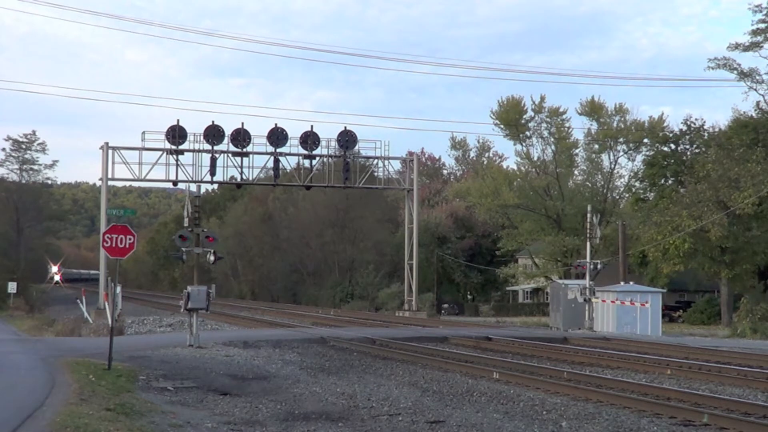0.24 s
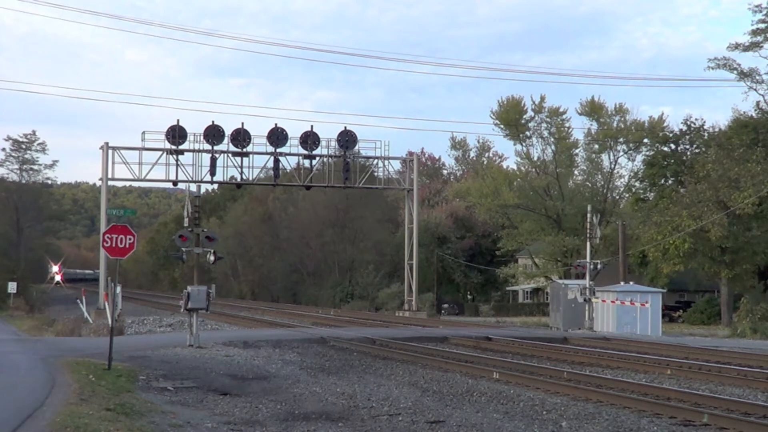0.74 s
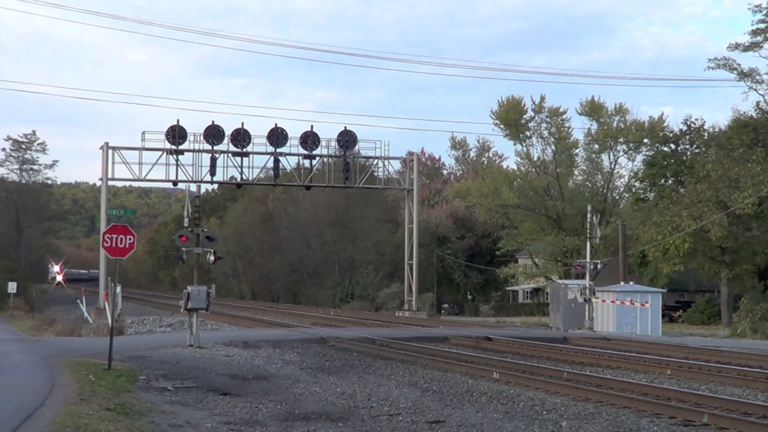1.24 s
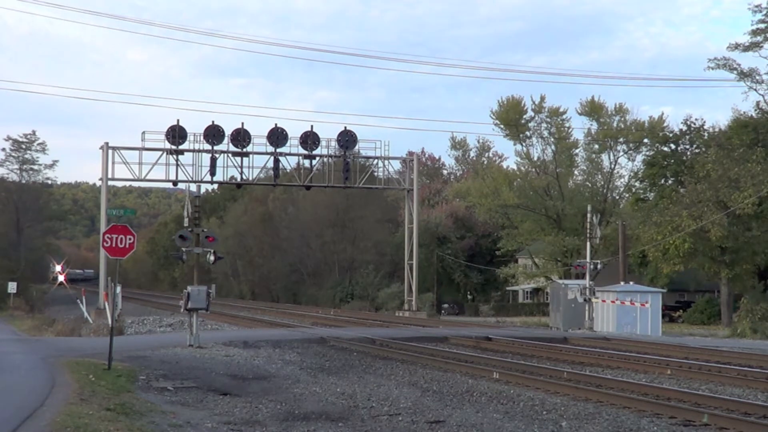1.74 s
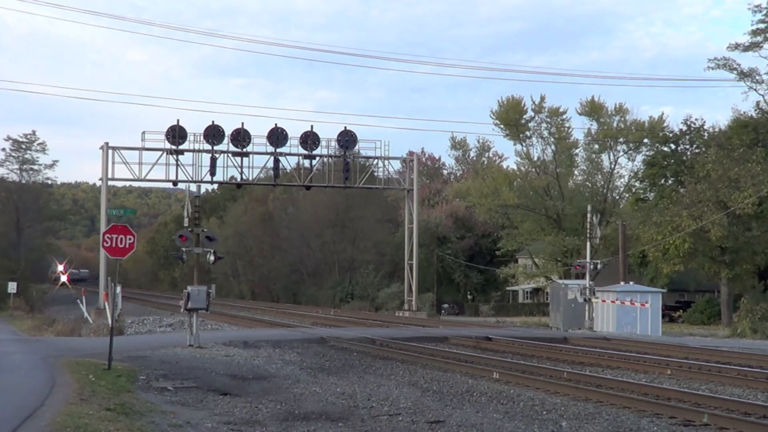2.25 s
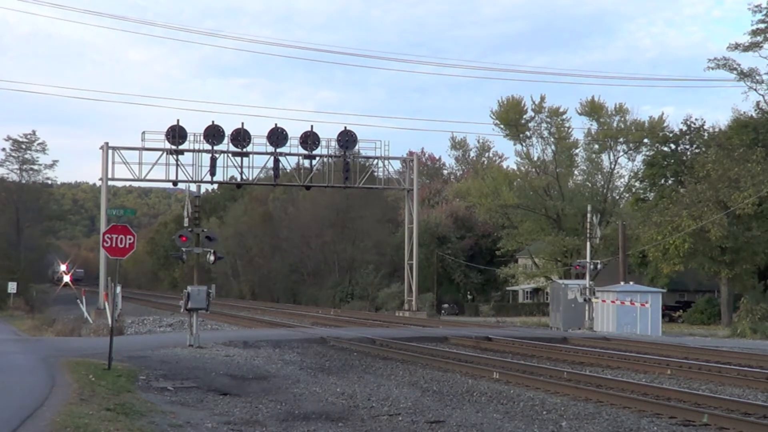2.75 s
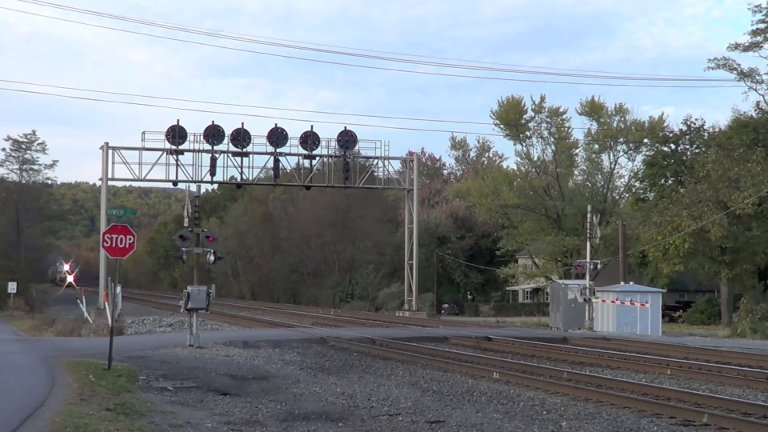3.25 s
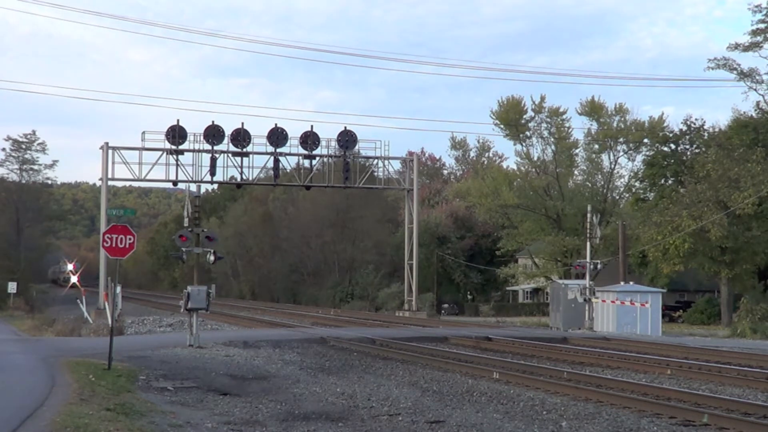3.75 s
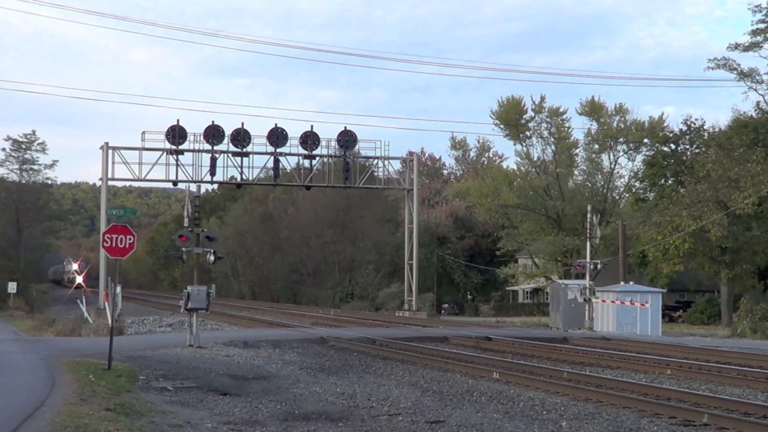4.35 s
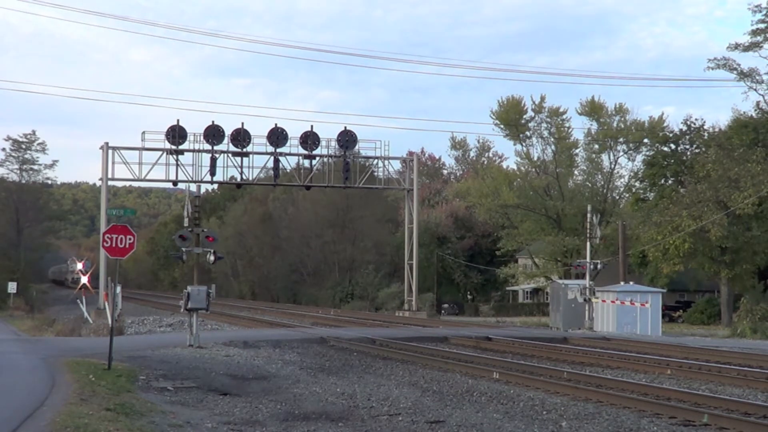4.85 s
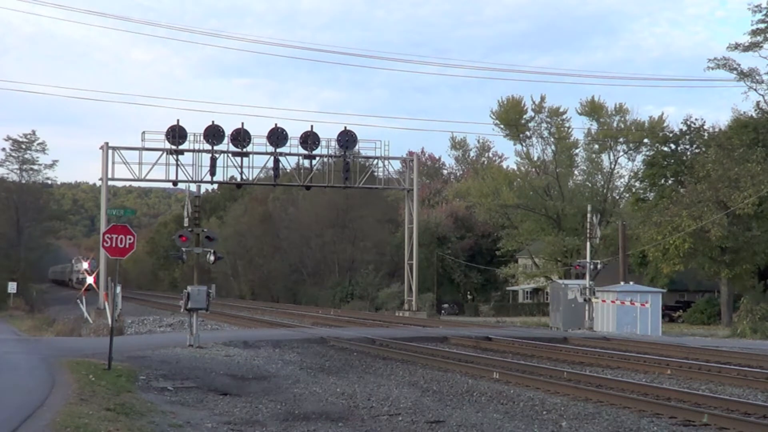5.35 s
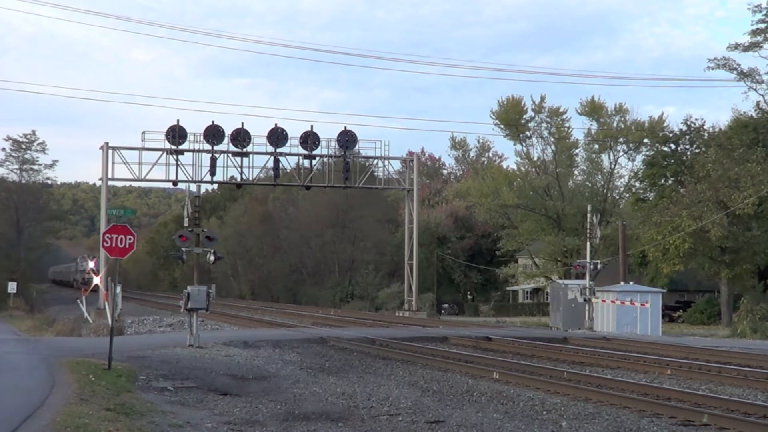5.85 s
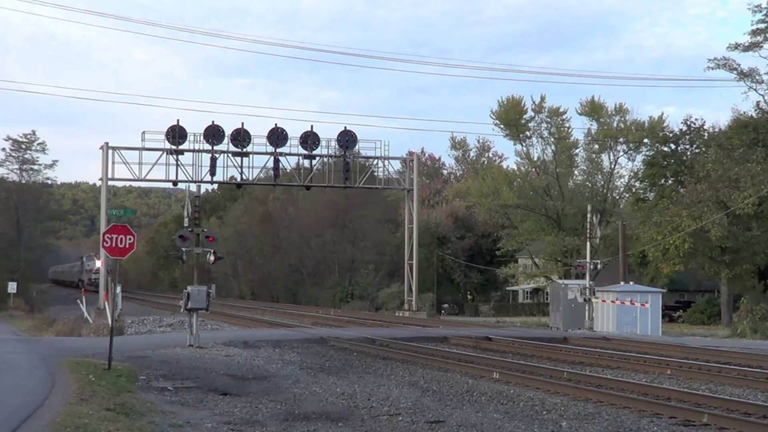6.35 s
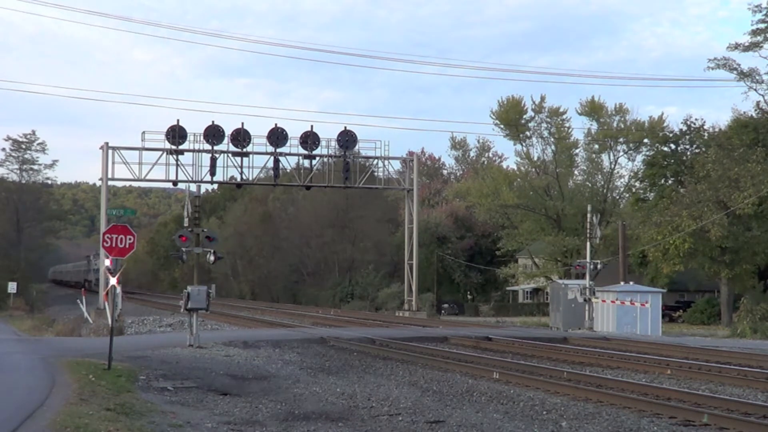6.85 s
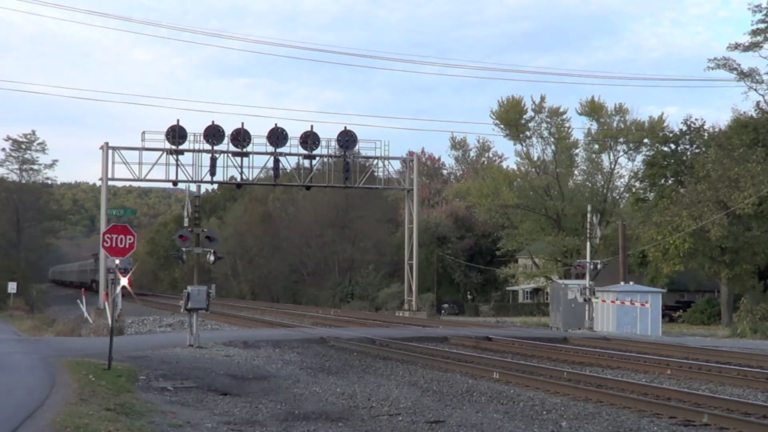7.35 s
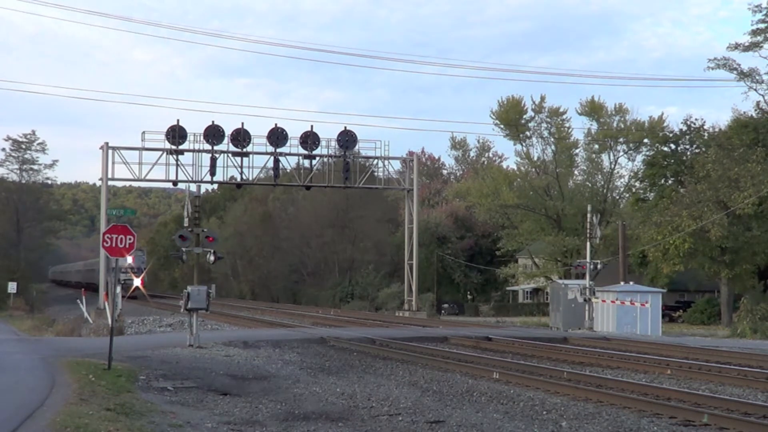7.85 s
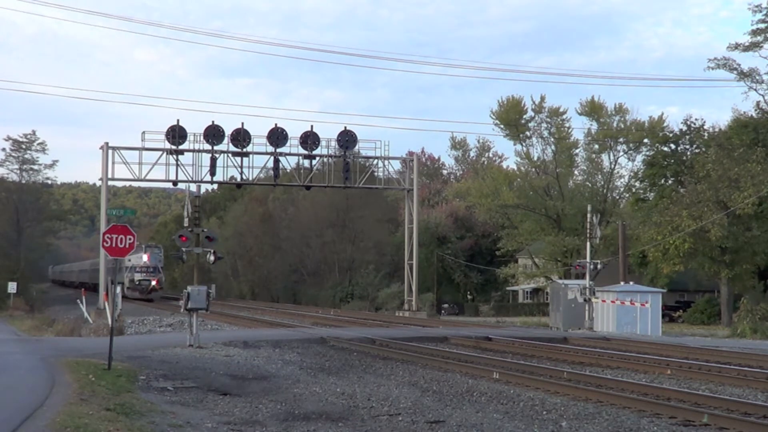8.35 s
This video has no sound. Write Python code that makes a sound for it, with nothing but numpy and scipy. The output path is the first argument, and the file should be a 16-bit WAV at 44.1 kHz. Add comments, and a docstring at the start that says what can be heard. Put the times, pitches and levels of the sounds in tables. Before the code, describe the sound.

A fixed trackside microphone hears a heavy diesel engine coming closer. At first there is a muted rumble with a distant airy rush, small rustles, insect shimmer and a brief bird twitter. The deep chugging boom and rough exhaust gain strength, echoing off trees; rolling noise grows and steel flanges scrape juddering. Just before the cut, a loud dissonant horn chord starts and is still sounding as it ends.

```python
"""A twelve-cylinder diesel locomotive approaches a rural level crossing under load, heard from beside the track.
Its exhaust is a train of unequal pulses, a pattern repeated eight times a second, sent through muffler and stack.
Shaped noise makes the rush of wheels and fans, louder and brighter as it nears; at the very end the air horn,
built from swelling harmonics, opens. Pulsing noise bands make insects, sliding sines a far bird, and short noise
bursts faint rustles; a light breeze and the camera's own hiss and whine lie behind."""
import sys
import numpy as np
from scipy import signal
from scipy.fft import rfft, irfft, next_fast_len
from scipy.io import wavfile
from scipy.ndimage import uniform_filter1d

SR = 44100
rng = np.random.default_rng(int(sys.argv[2]) if len(sys.argv) > 2 else 0)


def unload_audio(sound):
    """Save the sound as a 16-bit wav file, at the path given as the first command line argument."""
    columns = np.transpose(np.atleast_2d(sound))
    # keep every value between -1 and 1, then stretch to whole-number steps
    steps = np.round(np.clip(columns, -1, 1) * 32767)
    wavfile.write(sys.argv[1], SR, steps.astype(np.int16))


N = 378819
T = np.arange(N) / SR
PADDED = 2 * next_fast_len(N // 2 + SR // 2, True)  # transform length with room for tails


def undb(db):
    """Turn decibels into a gain."""
    return 10 ** (np.asarray(db) / 20)


def unit(x):
    """Scale a sound to an average (rms) strength of 1."""
    return x / np.sqrt(np.mean(x ** 2))


def sine(hz):
    """A sine whose pitch may change from sample to sample."""
    return np.sin(2 * np.pi * np.cumsum(hz) / SR)


def curve(rows):
    """Join (time, value) points by straight lines."""
    seconds, values = np.transpose(rows)
    return np.interp(T, seconds, values)


def log_frequencies():
    """Logarithms of the transform's frequencies, with those below 1 Hz held at 1 Hz."""
    return np.log(np.maximum(np.fft.rfftfreq(PADDED, 1 / SR), 1))


def colour(x, points, ringing=False):
    """Filter by a spectrum of (Hz, dB) points; a ringing body answers only after it is struck."""
    hz, db = np.transpose(points)
    gain = undb(np.interp(log_frequencies(), np.log(hz), db))
    if ringing:
        # minimum phase: fold the cepstrum so that nothing sounds ahead of the blow
        cepstrum = irfft(np.log(gain))[:PADDED // 2]
        gain = np.exp(2 * rfft(cepstrum, PADDED) - cepstrum[0])
    return irfft(rfft(x, PADDED) * gain, PADDED)[..., :N]


def resonate(x, hz, width):
    """A resonance, applied twice for steep skirts."""
    b, a = signal.iirpeak(min(hz, SR / 2 - 1), hz / (1.5 * width), fs=SR)
    once = signal.lfilter(b, a, x)
    return signal.lfilter(b, a, once)


def split(x, edge_hz):
    """The parts of a sound below and above a frequency."""
    lowpass = signal.butter(8, edge_hz, fs=SR, output="sos")
    low = signal.sosfiltfilt(lowpass, x, padlen=0)
    return low, x - low


def walk(rate):
    """Smooth random wander with a spread near 1, drawing about `rate` new values a second."""
    k = max(int(SR / rate), 2)
    steps = np.repeat(rng.standard_normal(N // k + 1), k)
    smooth = uniform_filter1d(uniform_filter1d(steps, k), k)
    return unit(smooth)[:N]


def stereo_noise(side_db):
    """Noise shared by both ears, plus a part of opposite sign in each."""
    mid, side = rng.standard_normal((2, N))
    return mid + undb(side_db) * np.array([side, -side])


def pulses(times, sizes):
    """Single-sample impulses at the given times."""
    inside = (times >= 0) & (times < (N - 1) / SR)
    return np.bincount((times[inside] * SR).astype(int), sizes[inside], N)


def opening(start, rise):
    """A straight rise from 0 to 1 that then stays open."""
    return np.clip((T - start) / rise, 0, 1)


def envelope(start, attack, hold, release):
    """A straight rise, a hold and an exponential fall."""
    return opening(start, attack) * np.exp(-np.maximum(T - start - attack - hold, 0) / release)


def woods(x, t60, wet_db):
    """The direct sound plus its scatter from the trees, different at each ear; t60 is the 60 dB decay in s."""
    t = T[:SR]
    decay = undb(-60 * t / t60)
    build_up = 1 - np.exp(-t / 0.014)
    tail = rng.standard_normal((2, SR)) * decay * build_up
    tail /= np.sqrt(np.sum(tail ** 2, axis=1, keepdims=True))
    return x + undb(wet_db) * signal.fftconvolve(x[None], tail, axes=1)[:, :N]


def nearing(db, loss_db_per_m):
    """Level in dB on the approach: sound spreads as 1 / distance and ground and air take more with each metre."""
    start_m, train_m_per_s = 217.5, 16.83  # distance at the start, steady speed towards the crossing
    reference_m = 100  # the distance at which `db` is the level
    metres = np.maximum(start_m - train_m_per_s * T, 10)
    return db - 20 * np.log10(metres / reference_m) - loss_db_per_m * (metres - reference_m)


def hidden():
    """How far the bend still screens the locomotive, from 1 down to 0."""
    clears_s, clearing_s = 3.52, 0.58  # when it comes out, how gradually
    return (1 - np.tanh((T - clears_s) / (2 * clearing_s))) / 2


def camera():
    """Electronic hiss, a thin buzz pulsing at the picture rate, and steady whines."""
    # hiss spectrum: (frequency [Hz], relative level [dB])
    hiss_spectrum = [(100, 9), (2000, 6.5), (5000, -2), (8000, -2), (11000, -1), (14000, -1), (16000, -7)]
    # steady tones: (frequency [Hz], level [dB])
    whine_tones = [(7882, -79), (10369, -76.5), (15734, -63)]
    hiss = unit(colour(stereo_noise(side_db=-25.0), hiss_spectrum)) * undb(-55.5)
    picture_hz = 59.94
    gate = np.exp(-((T * picture_hz) % 1) / 0.26)  # fades within each picture
    grains = rng.standard_normal(N) * gate * undb(2.2 * walk(70))
    buzz = unit(resonate(grains, 12480, 700)) * undb(-65)
    whine = sum(np.sqrt(2) * undb(db) * np.sin(2 * np.pi * hz * T) for hz, db in whine_tones)
    return hiss + buzz + whine


def breeze(db=-53):
    """Light air rumbles on each microphone port separately, as low noise around 42 Hz."""
    rumble = unit(resonate(rng.standard_normal((2, N)), 42, 40))
    return rumble * undb(db + 1.2 * walk(1.5))


def chirr(hz, width, rate, db, depth=0.24):
    """One insect voice: a narrow noise band that pulses and swells."""
    chirp = 1 + depth * sine(rate * (1 + 0.144 * walk(4)))
    band = unit(resonate(stereo_noise(side_db=0), hz, width))
    return band * chirp * undb(db + walk(1.94))


def insects():
    """A distant chorus in the verge, each voice in its own band and rhythm."""
    # voices: (centre [Hz], width [Hz], average chirp rate [1/s], average level [dB])
    voices = [(3560, 520, 14, -61), (3520, 90, 5, -70), (4090, 70, 2.2, -66.7), (6530, 1900, 11, -63),
              (7600, 300, 9, -75.5)]
    return sum(chirr(*voice) for voice in voices)


def rustles(grain_db=3.0):
    """Brief grainy swishes and ticks close by: noise bands that swell and fade in a bell shape."""
    # swishes: (middle [s], spread [s], centre [Hz], width [Hz], level [dB])
    swishes = [(0.044, .002, 2100, 450, -41), (0.045, .002, 5700, 1500, -43),
               (0.06, 0.052, 8460, 6000, -51.5), (.22, 0.056, 5970, 5000, -57),
               (1.5, 0.83, 3930, 2500, -61), (1.06, 0.14, 7000, 6000, -61.5), (1.65, .07, 7960, 6000, -56),
               (4.756, .007, 9500, 1500, -53.5), (5.54, .008, 10200, 1800, -58.5)]
    grains = stereo_noise(side_db=-12) * undb(grain_db * walk(300))
    out = 0
    for middle, spread, hz, width, db in swishes:
        swell = np.exp(-((T - middle) / spread) ** 2 / 2)
        out = out + unit(resonate(grains, hz, width)) * undb(db) * swell
    return out


def bird(uneven_db=0.5):
    """A small bird twitters far off: quick sine notes that each slide down, blurred by the trees."""
    # notes: (middle [s], pitch at the middle [Hz], level [dB])
    notes = [(1.24, 3230, -60), (1.283, 3280, -61.5), (1.318, 3280, -57), (1.358, 3310, -58.5),
             (1.401, 3310, -57), (1.445, 3260, -60), (1.486, 3250, -58.5), (1.524, 3320, -61),
             (1.568, 3300, -61), (1.61, 3270, -62), (1.653, 3220, -58.5), (1.687, 3330, -57.5),
             (1.714, 3520, -59), (1.756, 3410, -56.5), (1.792, 3480, -61), (1.83, 3440, -57),
             (1.872, 3500, -61), (1.907, 3460, -58.5), (1.98, 3430, -53), (2.018, 3550, -57),
             (2.055, 3470, -61), (2.09, 3450, -56.5), (2.245, 3600, -59.5)]
    spread_s, fall_hz_per_s = .0058, 6000  # spread of a note's bell shape, downward slide
    out = np.zeros(N)
    for middle, hz, db in notes:
        near = np.abs(T - middle) < 5 * spread_s
        t = T[near] - middle
        phase = 2 * np.pi * (hz * t - fall_hz_per_s * t ** 2 / 2)
        swell = np.exp(-(t / spread_s) ** 2 / 2)
        out[near] += np.sqrt(2) * undb(db) * swell * np.sin(phase)
    return woods(out * undb(uneven_db * walk(200)), t60=.4, wet_db=-8)


def far_rush():
    """A distant mid-pitched rush of noise holds for a moment, flares once and dies away."""
    # rushes: (start [s], attack [s], hold [s], release [s], centre [Hz], width [Hz], level [dB])
    rushes = [(-.1, 0.093, 1.36, 0.82, 850, 735, -47), (.8, .07, .05, .07, 820, 350, -44.5)]
    out = 0
    for *shape, hz, width, db in rushes:
        band = unit(resonate(stereo_noise(side_db=-1.5), hz, width))
        out = out + band * envelope(*shape) * undb(db + 0.88 * walk(8.9))
    return out


def flanges(judder_db=1.5):
    """Wheel flanges scrape the curve: juddering noise rings the steel at a few pitches."""
    # ringing of the steel: (frequency [Hz], width [Hz], relative level [dB])
    steel_modes = [(1950, 330, 2), (2330, 330, .3), (2800, 420, -2.5), (3280, 330, -10)]
    # the air takes the top off that ringing: (frequency [Hz], gain [dB])
    dulling = [(3200, 0), (4000, -9), (5000, -22)]
    # scrapes: (start [s], attack [s], hold [s], release [s], level [dB])
    scrapes = [(3.7, .12, .1, .25, -56), (5.3, .12, .1, .17, -50), (5.94, .08, .13, .15, -48),
               (6.22, .12, .06, .2, -40.6), (6.46, .04, .1, .35, -46.5), (6.8, .6, 1, .5, -46)]
    scrape = stereo_noise(side_db=-39)
    ringing = sum(undb(db + 2 * walk(14)) * resonate(scrape, hz, width) for hz, width, db in steel_modes)
    pressing = sum(undb(db) * envelope(*shape) for *shape, db in scrapes)
    return unit(colour(ringing, dulling) * undb(judder_db * walk(60))) * pressing


def rolling():
    """The train roars from afar; wheels and fans add treble as the bend clears and less air lies between."""
    # low roar of the train: (frequency [Hz], relative level [dB])
    roar_spectrum = [(20, -12), (45, 6), (90, 0), (150, 6), (250, 1.5), (350, -0.5), (470, -4), (620, 0.5),
                     (800, -2.5), (1100, -6), (1500, -13.5), (2200, -20), (4000, -53)]
    # rush of wheels and fans: (frequency [Hz], relative level [dB])
    rush_spectrum = [(150, -7), (350, 4), (450, 4), (600, -4.5), (900, -16), (1300, 1.5), (1600, -1.5),
                     (2000, 0.5), (2400, -1.5), (3000, -8), (3700, -14), (4400, -22), (6000, -33),
                     (9000, -67)]
    # highest treble: (frequency [Hz], relative level [dB])
    hiss_spectrum = [(2000, -20), (3500, 8), (4500, -1), (5500, -0.5), (7000, -5.5), (8000, -18),
                     (10000, -35), (14000, -39)]
    wagons_db = -39  # steady roar of the wagons far behind
    shadow_db = -10.5  # how much the bend hides the rush
    # each call of nearing: level at the reference distance (dB), loss on the way (dB per m)
    roar_gain = np.hypot(undb(wagons_db), undb(nearing(-39.5, 0.048)))
    rush_db = nearing(-38.5, 0.02) + shadow_db * hidden()
    hiss_db = nearing(-54.5, 0.2336)
    roar = unit(colour(stereo_noise(side_db=-6.0), roar_spectrum)) * roar_gain * undb(.5 * walk(6.7))
    rush = unit(colour(stereo_noise(side_db=-14.0), rush_spectrum)) * undb(rush_db + .5 * walk(9))
    hiss = unit(colour(stereo_noise(side_db=-14.0), hiss_spectrum)) * undb(hiss_db + .5 * walk(12))
    return roar + rush + hiss + flanges()


def horn_whistle(waver=.005):
    """The first air whistles through a reed: one wavering sine."""
    # whistle: (opens at [s], rise [s], average pitch [Hz], average level [dB])
    whistle = (8.405, .025, 1227, -35)
    start, rise, hz, db = whistle
    return opening(start, rise) * undb(db + walk(50)) * sine(hz * (1 + waver * walk(90)))


def horn_air():
    """Air rushes through the horn's bells: shaped noise that rises as they open."""
    # rush of air: (frequency [Hz], relative level [dB])
    air_spectrum = [(250, -30), (400, 0), (650, 0), (800, -8), (1100, -7), (1500, -14), (2500, -14.5),
                    (4000, -25), (8000, -50)]
    air = unit(colour(rng.standard_normal(N), air_spectrum))
    return air * opening(8.425, .11) * undb(-30.5)


def horn(waver=.005, flutter_db=1.6, rasp_db=-19, bloom=.7):
    """Reed-driven bells speak one after another; pitch and overtones come up as the pressure builds."""
    # bells: (opens at [s], rise [s], pitch [Hz], level [dB],
    # second harmonic [dB against the first], third harmonic [dB against the first])
    bells = [(8.416, .035, 340, -20.6, -14, -20), (8.43, .1, 414, -23.5, -6, -13),
             (8.467, .06, 463, -21.5, -16.5, -22), (8.465, .045, 564, -19, -15.5, -20),
             (8.398, .14, 590, -22.5, -13, -26), (8.452, .08, 657, -29, -21, -16)]
    brass_db, brass_fall_db, brass_rise_s = -22.5, 2.8, .13  # fourth harmonic, fall per harmonic, swell
    scoop = .022  # how flat a bell starts, as a share of its pitch
    out = horn_whistle()
    for start, rise, hz, db, second_db, third_db in bells:
        pressure = opening(start, rise)
        bend = 1 - scoop * (1 - pressure) + waver * walk(120)
        phase = 2 * np.pi * np.cumsum(hz * bend) / SR + rng.uniform(0, 2 * np.pi)
        on = pressure > 0
        tone = np.zeros(N)
        # the reed's closing snap adds a falling row of brassy overtones, which swell after the low ones
        swell = opening(start, brass_rise_s)[on]
        brass = [swell * undb(brass_db - brass_fall_db * k) for k in range(9)]
        sizes = [1, undb(second_db), undb(third_db), *brass]
        for k, size in enumerate(sizes, 1):
            # higher harmonics wait for more pressure
            tone[on] += size * pressure[on] ** (k ** bloom) * np.sin(k * phase[on])
        # a reed that has not settled yet rasps a little
        rasp = 1 + undb(rasp_db) * walk(440)
        out = out + tone * rasp * undb(db + flutter_db * walk(50))
    return woods(out + horn_air(), t60=0.67, wet_db=-13)


def treeline(boom, bark):
    """Echoes from trees by the track: the engine nears them more slowly, so they sound flat and beat against it."""
    # echoes: (delay at the anchor time [s], share by which they are flat, boom level [dB], bark level [dB])
    echoes = [(.1034, .0285, -18, -11), (.157, .019, -33, -16), (.19, .043, -33, -16)]
    anchor_s = 7
    level_s, onset_s = 6.5, .5  # when the locomotive draws level with the trees, how gradually
    beside = (1 + np.tanh((T - level_s) / onset_s)) / 2
    out = 0
    for delay, flat, boom_db, bark_db in echoes:
        left_at = T - delay - flat * (T - anchor_s)
        out = out + np.interp(left_at, T, undb(boom_db) * boom + undb(bark_db) * bark)
    return out * beside


def muffler_boom(fired, scatter_db=.7, jitter_ms=0.054):
    """Twelve unequal firings a turn boom through the muffler."""
    # firings of one turn, in order: (average lateness [ms], strength [dB])
    cylinders = [(-0.32, -2), (0.41, 0.5), (0.093, -4), (0.54, 1.4), (0.43, -2), (0.33, -0.55), (0.97, -4),
                 (0.1, -2.5), (0.36, -3), (-0.51, -2.5), (-0.58, -4.5), (0.5, -5)]
    # muffler response: (frequency [Hz], relative level [dB])
    muffler_response = [(5, -68), (15, -31), (30, -35), (48, 2), (62, -16), (72, 3), (80, 8), (88, 3),
                        (96, 1), (120, 0.5), (144, -5.5), (160, -31), (192, -53), (300, -38.5), (600, -80)]
    # boom swelling unevenly as it nears: (time [s], level [dB])
    boom_level = [(0, -31), (1.3, -29), (2.7, -24.0), (3.05, -25), (3.85, -22.5), (4.3, -24.5), (4.9, -20),
                  (5.75, -19), (6.2, -16.5), (7.3, -16), (7.8, -14), (8.12, -15.5), (8.55, -16.7)]
    late_ms, strength_db = np.transpose(cylinders)
    slip, force = rng.standard_normal((2, *fired.shape))
    # weak cylinders burn less evenly than strong ones
    unsteady = undb(-strength_db)
    delay = (late_ms + jitter_ms * slip) / 1000
    firings = pulses(fired + delay, undb(strength_db + scatter_db * unsteady * force))
    # the deepest throb swells evenly with the approach
    throb, boom = split(unit(colour(firings, muffler_response)), 78)
    return boom * undb(curve(boom_level)) + throb * undb(nearing(-17, 0.04))


def stack_bark(turn_starts, scatter_db=.85):
    """Sharp blow-downs ring the stack on every turn; the bend also screens its upper ring."""
    # blow-downs of one turn: (delay after the first cylinder's nominal firing [ms], average strength [dB])
    blow_downs = [(-5.7, 0), (4.3, -5.6), (19.4, -9.8), (27.3, -9.8), (41.1, -5.8), (53.6, -4.8),
                  (76.9, -6.6), (91.9, -10.5)]
    # stack response: (frequency [Hz], relative level [dB])
    stack_response = [(80, -32.5), (128, -20.5), (140, -4), (153, -19), (168, -4.5), (184, 1), (201, -1),
                      (216, 2), (240, -3), (250, -5), (270, -16.5), (286, -9.5), (325, -29.5), (360, -18),
                      (450, -36), (900, -74.5)]
    # stack as it nears: (time [s], level [dB])
    bark_level = [(0, -43), (2, -38.3), (3.2, -36.2), (4.4, -33.4), (5.4, -32.1), (6.4, -30.5), (7.1, -28),
                  (8.5, -27)]
    after_ms, sharp_db = np.transpose(blow_downs)
    barked = turn_starts + after_ms / 1000
    # weak blow-downs vary more than strong ones
    uneven_db = scatter_db * undb(-sharp_db) * rng.standard_normal(barked.shape)
    blows = pulses(barked, undb(sharp_db + uneven_db))
    bark, ring = split(unit(colour(blows, stack_response, ringing=True)), 190)
    ring_db, ring_shadow_db = -0.8, -3  # in the open, and added while hidden
    return (bark + ring * undb(ring_db + ring_shadow_db * hidden())) * undb(curve(bark_level))


def exhaust():
    """The crankshaft's turns time the muffler's boom and the stack's bark, which the trees scatter and echo."""
    # engine speed as heard: (time [s], crankshaft speed [turns/s])
    engine_speed = [(0, 8.125), (.8, 8.122), (1.7, 8.052), (3.2, 8.067), (4.4, 8.04), (5, 8.025),
                    (6.2, 8.014), (8.6, 8.014)]
    first_turn = .70  # share of a turn already done at the start
    turns = first_turn + np.cumsum(curve(engine_speed)) / SR
    count = np.arange(int(turns[-1]) + 1)[:, None]
    # one row a turn, one column a cylinder; firings outside the scene land at -1 s
    fired = np.interp(count + np.arange(12) / 12, turns, T, left=-1, right=-1)
    muffler = muffler_boom(fired)
    stack = stack_bark(fired[:, :1])
    return muffler + woods(stack, t60=0.66, wet_db=-12) + treeline(muffler, stack)


def ports(x, pan_db=1.3):
    """The train is a little louder in the left port, and its bass is shifted in phase between the two."""
    # phase between the microphone ports: (frequency [Hz], lead of the left [rad])
    port_phase = [(30, -0.42), (100, -0.41), (340, -0.71), (1000, -0.0049)]
    hz, lead = np.transpose(port_phase)
    # half of the level and phase difference goes to each port
    half = undb(pan_db / 2) * np.exp(.5j * np.interp(log_frequencies(), np.log(hz), lead))
    return irfft(rfft(x, PADDED) * np.array([half, 1 / half]), PADDED)[:, :N]


def scene():
    """The train comes from slightly left of centre over the quiet verge."""
    verge = camera() + breeze() + insects() + rustles() + bird()
    train = far_rush() + rolling() + horn() + exhaust()
    return verge + ports(train)


def record(dry):
    """The camera cuts the top steeply, above 15.9 kHz."""
    lowpass = signal.ellip(12, .1, 80, 15900, fs=SR, output="sos")
    return signal.sosfilt(lowpass, dry)


dry = scene()
out = record(dry)
unload_audio(out)
```